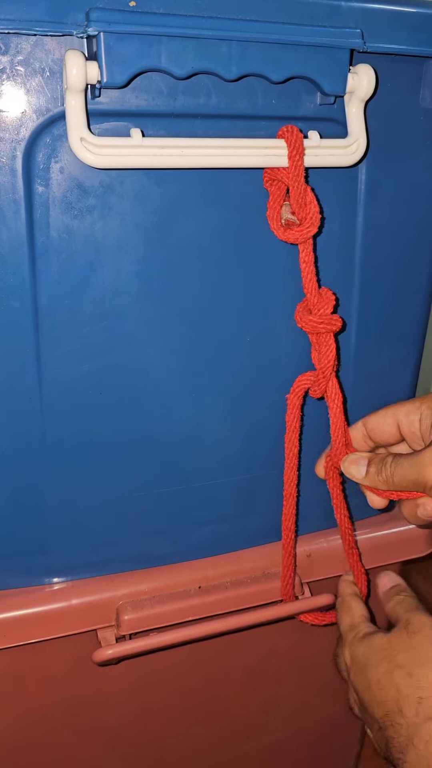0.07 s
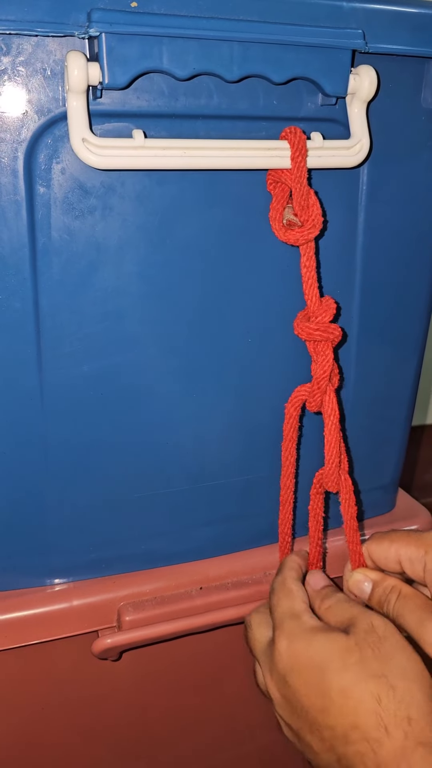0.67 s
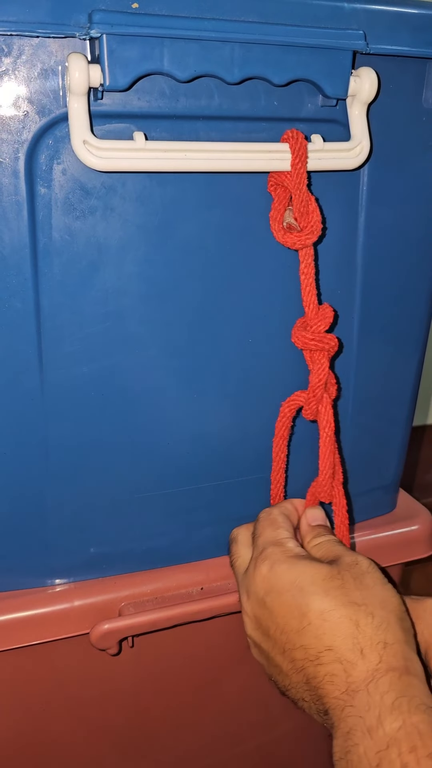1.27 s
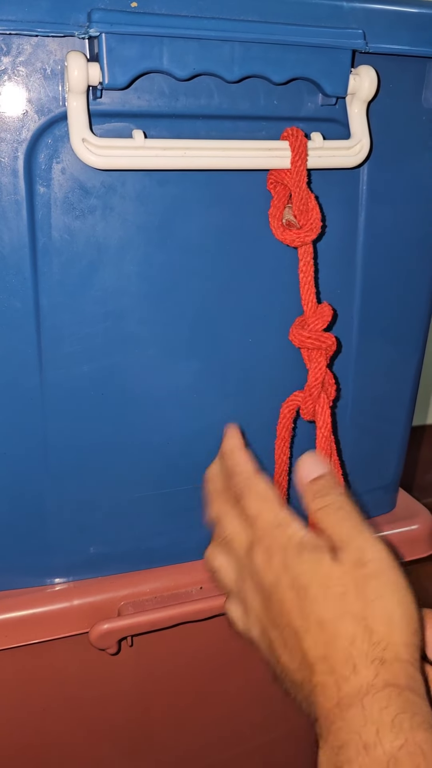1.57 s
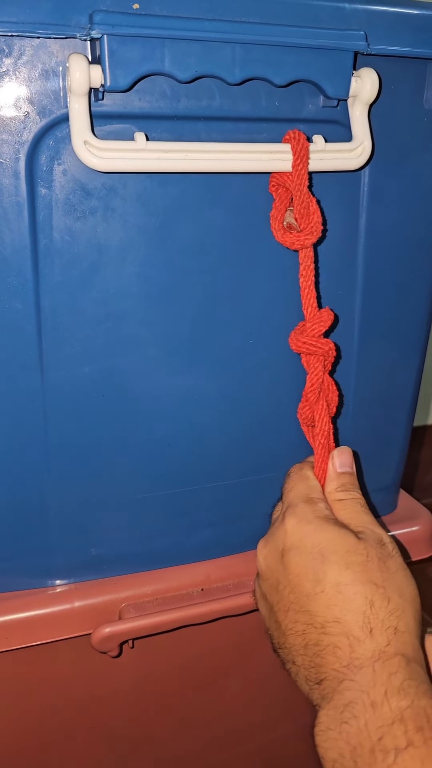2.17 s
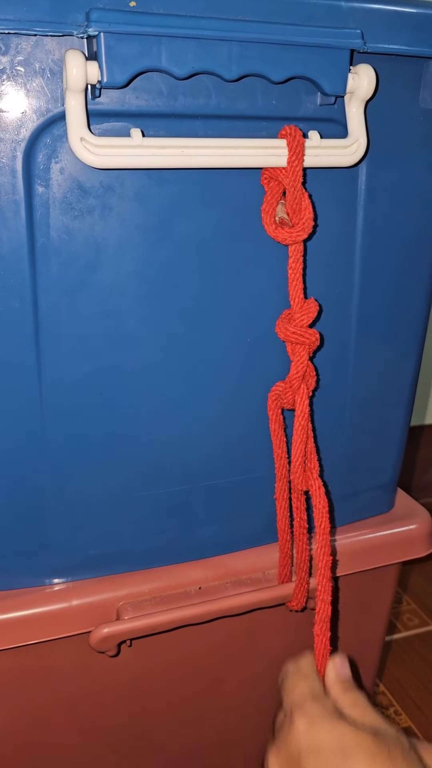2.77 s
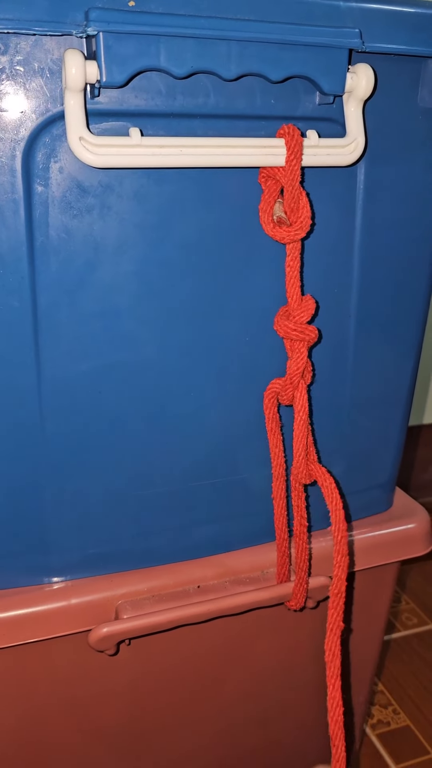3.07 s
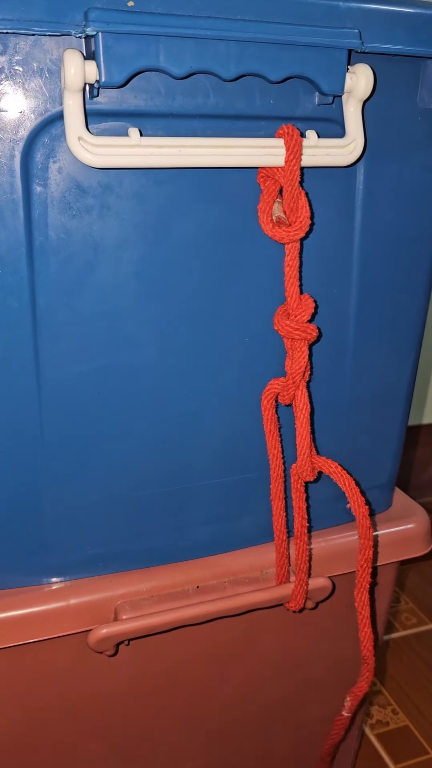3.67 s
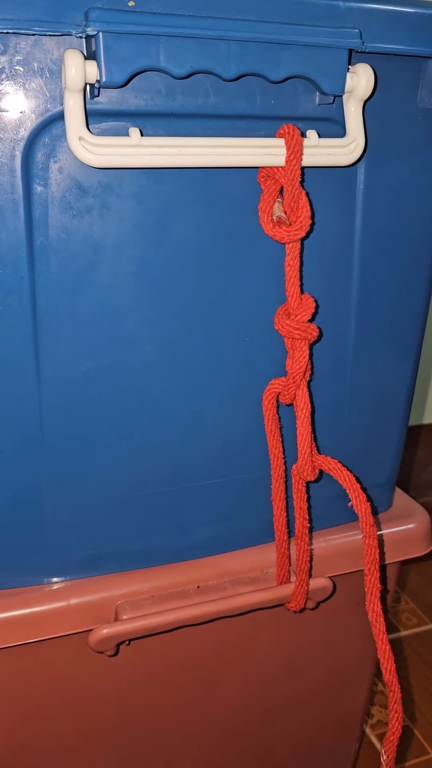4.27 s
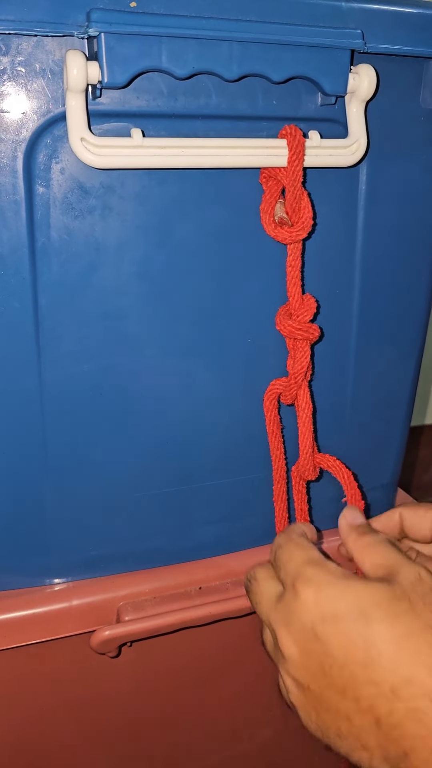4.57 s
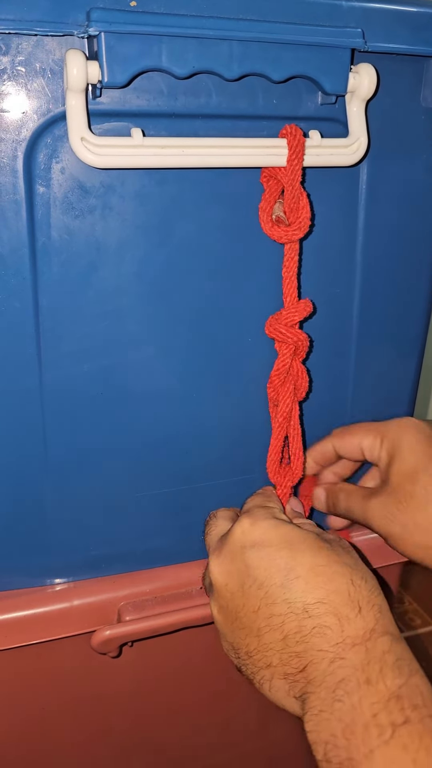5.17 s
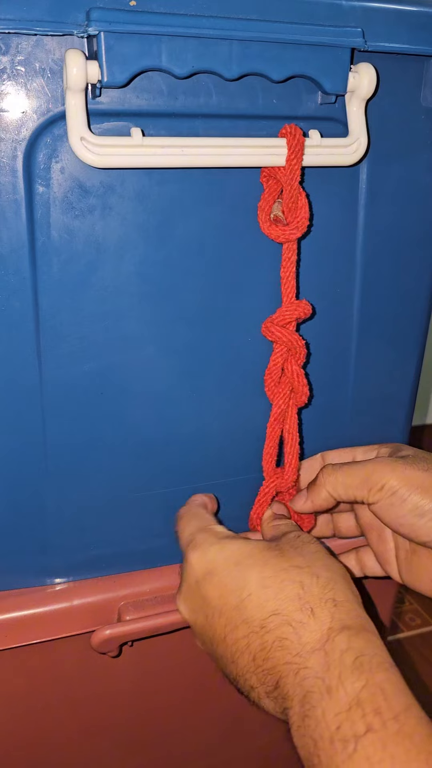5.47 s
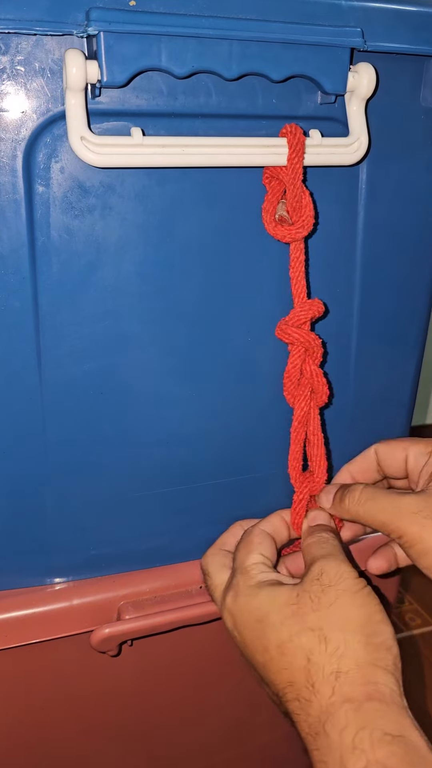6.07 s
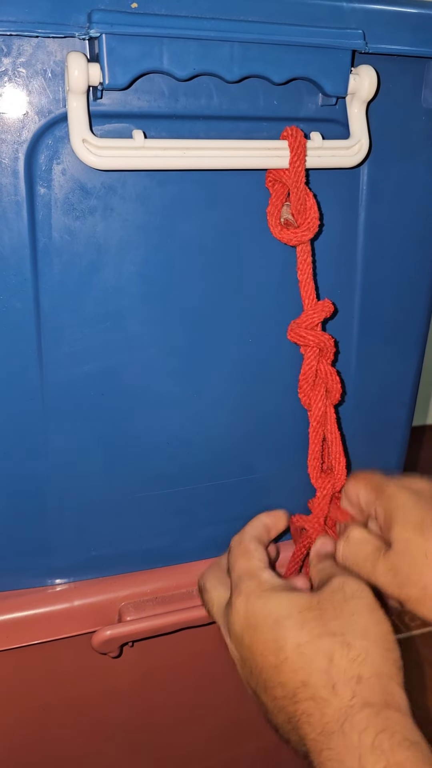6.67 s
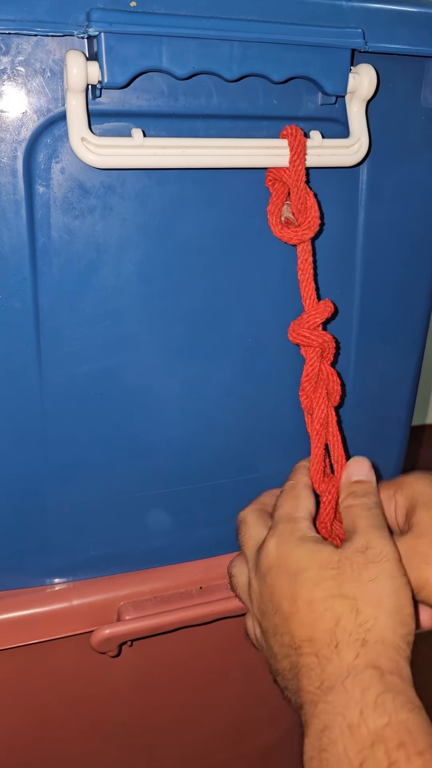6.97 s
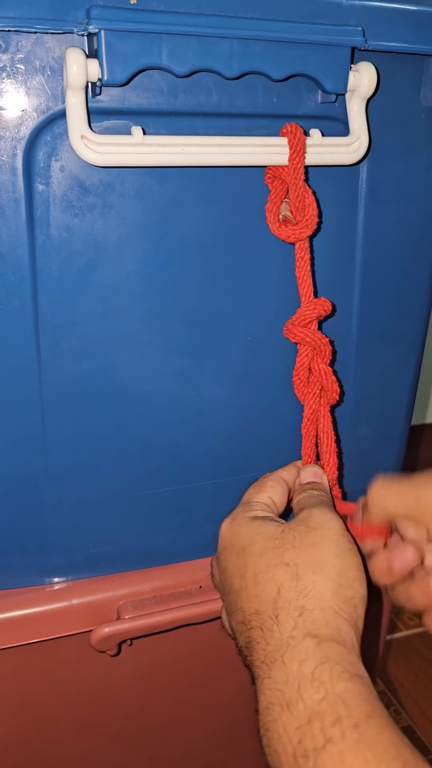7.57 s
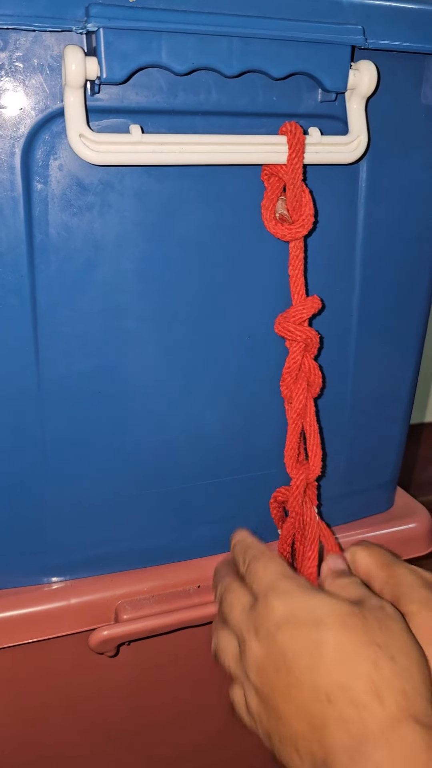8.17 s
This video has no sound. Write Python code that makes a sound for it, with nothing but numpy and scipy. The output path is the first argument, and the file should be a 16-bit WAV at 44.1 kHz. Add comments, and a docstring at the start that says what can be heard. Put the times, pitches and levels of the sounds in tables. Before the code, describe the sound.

Hands loop and tighten a rope against a hollow plastic storage bin, close to the microphone. Quick rasping pulls and a cluster of dull knocks come first, with one distant, echoing bang among them. After a smooth slide of loose rope, the room goes nearly quiet for a moment. Then come busier rustles, dry scrapes and tiny snaps of strands, with the bin wall booming softly and one sharp tug near the end.

```python
"""A quiet room: a twisted rope, hung from the handle of a big plastic storage bin, is looped, pulled
through and cinched by hand. Its fibres fizz and rasp as it slides, and single strands snap past each other.
Stick and slip shakes the hollow bin, rope and knuckles knock on it, and its walls boom as they flex.
Farther off something bangs once and a few faint swishes pass."""
import sys
import numpy as np
from scipy import signal
from scipy.fft import rfft, irfft
from scipy.io import wavfile
from scipy.ndimage import uniform_filter1d

SR = 44100
rng = np.random.default_rng(int(sys.argv[2]) if len(sys.argv) > 2 else 0)


def master(y):
    """Save y as 16-bit WAV."""
    cut = np.clip(np.atleast_2d(y).T, -1, 1)
    pcm = np.round(cut * 32767)  # scale
    wavfile.write(sys.argv[1], SR, pcm.astype(np.int16))


N = 371763
TIME = np.arange(N) / SR

# rope through the fingers: fastest t/s, swell/s, fade/s, fizz/dB, rasp/dB, drag/dB
GRIPPED_STROKES = [(0.17, 0.077, 0.12, -65, -62, -52), (0.385, 0.021, 0.049, -50.5, -45, -48),
                   (0.51, 0.045, 0.076, -68, -70, -44), (1.022, 0.017, 0.049, -60, -58, -52),
                   (1.24, 0.096, 0.053, -69, -75, -47), (1.52, 0.023, 0.031, -67.5, -65, -45.5),
                   (1.825, 0.056, 0.043, -74, -78, -53), (1.94, 0.063, 0.033, -72.5, -70, -56),
                   (2.118, 0.061, 0.055, -68, -71, -53), (2.29, .018, .04, -67.5, -64.5, -45.5),
                   (2.495, 0.02, 0.071, -67.5, -66, -49.5), (4.698, 0.029, 0.028, -72, -89, -69),
                   (4.85, 0.059, 0.13, -73, -76, -52), (4.984, 0.17, 0.03, -67, -69.5, -59.5),
                   (5.14, 0.067, 0.032, -68, -70.5, -53.5), (5.23, .04, 0.11, -70, -71, -51.5),
                   (5.35, 0.021, 0.038, -59.5, -51, -54), (5.45, 0.056, 0.02, -65, -64, -48.5),
                   (5.63, 0.099, 0.032, -73, -63, -54), (5.68, 0.029, .025, -69.5, -77, -44.5),
                   (5.805, 0.05, 0.065, -63.5, -57, -55.5), (5.87, 0.032, 0.063, -61, -54.5, -43.5),
                   (5.946, 0.028, .03, -60.5, -53, -44.5), (6.07, 0.026, 0.12, -63.5, -57, -48),
                   (6.234, 0.014, 0.015, -44.5, -50, -33.5), (6.28, 0.067, 0.12, -66.5, -77, -63),
                   (6.55, 0.073, 0.05, -59, -60.5, -46), (6.686, 0.057, .04, -63.5, -74, -56.5),
                   (6.79, 0.049, 0.029, -54, -51.5, -41.5), (6.942, 0.049, 0.051, -66.5, -62.5, -50.5),
                   (7.03, 0.045, 0.023, -63, -67, -54), (7.18, 0.084, .08, -65.5, -78, -55.5),
                   (7.29, 0.083, 0.045, -60.5, -58.5, -45.5), (7.395, 0.059, .06, -52.5, -48, -43.5),
                   (7.6, 0.069, 0.052, -70.5, -75, -65.5), (7.738, .04, 0.031, -47.5, -45, -32.5),
                   (7.838, 0.039, 0.053, -74, -55.5, -45.5), (8.042, 0.042, 0.12, -63.5, -60.5, -45.5),
                   (8.22, 0.18, .12, -71.5, -71, -60), (8.43, 0.021, .03, -60, -68, -70)]
# loose rope through the open hand: fastest t/s, swell/s, fade/s, sheen/dB, rasp/dB, drag/dB
LOOSE_RUNS = [(2.66, 0.14, 0.23, -58, -56.5, -44), (2.88, 0.32, 0.22, -64, -80, -64),
              (3.12, 0.29, 0.2, -66, -89, -65), (4.259, .055, 0.027, -63, -77, -77)]
# fibre fizz: f/Hz, level/dB
FIZZ_SPECTRUM = [(1500, -26), (3500, -4.5), (4800, -3), (6300, -4.5), (7600, -3), (9000, -3.5),
                 (10700, -3.5), (11500, 3.5), (12500, -4), (15800, -0.5)]
# rope rubbing the bin: f/Hz, level/dB
RUB_SPECTRUM = [(60, -12), (130, -8.5), (190, 0), (280, 1), (360, -7), (520, -10.5), (680, -17.5),
                (850, -20), (1400, -31), (3000, -52.5)]
# rope squeaking in the grip: f/Hz, width/Hz, level/dB
GRIP_RESONANCES = [(646, 127, 13), (810, 130, -3), (1080, 270, 2.5), (1410, 140, -1.5), (1605, 167, 7),
                   (1996, 150, -1), (2330, 1550, -8), (3020, 530, -5), (4250, 320, -4.5), (4850, 410, -3)]
# left-right likeness: f/Hz, correlation
COHERENCE = [(100, .99), (300, 0.9), (480, 0.64), (700, 0.36), (1200, 0), (16000, 0)]


def gain_of(db):
    """Decibels to amplitude."""
    return 10 ** (np.asarray(db) / 20)


def read(points, hz):
    """Table lookup on a log-frequency axis."""
    f, value = np.transpose(points)
    return np.interp(np.log(hz + 1), np.log(f + 1), value)


def add(mix, start_s, sound):
    """Mixes a sound in at start_s."""
    part = mix[:, max(round(start_s * SR), 0):][:, :sound.shape[-1]]
    part += sound[..., :part.shape[1]]


def colour(x, spectrum):
    """Shapes two unrelated channels and makes their bass alike; their mean has rms 1."""
    hz = np.fft.rfftfreq(x.shape[1], 1 / SR)
    a, b = rfft(x) * gain_of(read(spectrum, hz))
    same = read(COHERENCE, hz)
    mid, side = a * np.sqrt(1 + same), b * np.sqrt(1 - same)
    pair = irfft(np.array([mid + side, mid - side]), x.shape[1])
    return pair / np.sqrt(np.mean(pair.mean(0) ** 2) + 1e-20)


def hiss(spectrum, n=N):
    """Steady coloured noise."""
    return colour(rng.standard_normal((2, n)), spectrum)


def grains(spectrum, per_s, spread_db, n=N):
    """Tiny slips of many sizes, each in both channels."""
    size = gain_of(spread_db * np.minimum(rng.exponential(1, n), 3))
    slipping = rng.random(n) < per_s / SR
    return colour(size * slipping * rng.choice([-1, 1], (2, n)), spectrum)


def wander(hz, n=N):
    """Random curve with hz knots a second."""
    knots = rng.standard_normal(int(n / SR * hz) + 2)
    return 1.47 * np.interp(np.arange(n) / SR * hz, np.arange(len(knots)), knots)


def resonances(modes):
    """Spectrum (f/Hz, level/dB) of resonances with steep skirts."""
    hz, width_hz, db = np.transpose(modes)[:, :, None]
    grid_hz = np.geomspace(100, 16000, 900)
    power = (gain_of(db) / (1 + ((grid_hz - hz) / width_hz) ** 2)) ** 2
    return np.transpose([grid_hz, 10 * np.log10(power.sum(0))])


def dying(x, decay):
    """Each band decays with its own t60."""
    hz, t, bands = signal.stft(x, SR, nperseg=512)
    fade = gain_of(-60 * t / read(decay, hz)[:, None])
    return signal.istft(bands * fade, SR, nperseg=512)[1][:, :x.shape[1]]


def ring(modes, scatter_db):
    """Damped modes; the higher ones are out of step between channels."""
    hz, db, t60_s = np.transpose(modes)[:, :, None]
    t = np.arange(int(0.8 * SR)) / SR
    envelope = gain_of(db + scatter_db * rng.standard_normal(hz.shape) - 60 * t / t60_s)
    skew_rad = np.arccos(read(COHERENCE, hz)) / 2 * rng.choice([-1, 1], hz.shape)
    return np.array([(envelope * np.sin(2 * np.pi * hz * t + side * skew_rad)).sum(0) for side in (1, -1)])


def swing(t, hz, rise_cycles):
    """Vibration that peaks after rise_cycles, then dies."""
    age = hz * t / rise_cycles
    return age * np.exp(1 - age) * np.sin(2 * np.pi * hz * t)


def efforts(strokes, drop_db=12.5, roundness=1.24):
    """Gains of fizz, rasp and drag: each stroke swells to its fastest moment and fades."""
    t = TIME[::64]
    power = np.zeros((3, len(t)))
    for peak_s, swell_s, fade_s, *levels_db in strokes:
        away = np.maximum((peak_s - t) / swell_s, (t - peak_s) / fade_s)
        power += gain_of(np.array(levels_db)[:, None] - drop_db * away ** roundness) ** 2
    return np.array([np.interp(TIME, t, gain) for gain in np.sqrt(power)])


def through_bin(force, ring_db):
    """A force heard directly and through the bin's modes."""
    # f/Hz, level/dB, t60/s
    bin_modes = [(84, -6.5, 0.13), (173, 1.5, 0.1), (218, -3.5, 0.075), (256.7, 0.5, 0.081),
                 (318, -6, 0.095), (403.2, -0.5, 0.14), (500, 0.5, 0.12), (569, -4, 0.19),
                 (664, -0.5, 0.097), (736, -18, 0.067), (1100, -14, 0.12), (1405, -4, 0.12),
                 (1614, -27, .1), (1890, -17.5, 0.15)]
    rung = signal.fftconvolve(force, ring(bin_modes, scatter_db=3.5), axes=1)[:, :force.shape[1]]
    return force + gain_of(ring_db) * rung * np.linalg.norm(force) / np.linalg.norm(rung)


def dragging(tug_db=3, tug_lag_s=0.021):
    """Coarse stick and slip shakes the bin; its wall sways under tension and gives late to each tug."""
    # slow wall sway: t/s, level/dB
    sway_curve = [(0.0, -39.5), (0.21, -48), (1.13, -40), (1.5, -52.5), (2.28, -52.5), (2.7, -45.5),
                  (3.45, -62), (4.58, -52.5), (5.23, -58), (5.37, -49.5), (7.0, -51.5), (7.54, -56),
                  (7.89, -46.5), (8.43, -60.5)]
    # wall rumble: f/Hz, level/dB
    wall_spectrum = [(22, -47), (35, -5), (45, 12.5), (62, 13.5), (86, 5.5), (105, 4), (135, -3),
                     (250, -50)]
    _, _, drag = efforts(GRIPPED_STROKES + LOOSE_RUNS)
    slips = grains(RUB_SPECTRUM, per_s=600, spread_db=3) * drag
    pole = np.exp(-1 / (tug_lag_s * SR))
    tug = gain_of(tug_db) * signal.lfilter([1 - pole], [1, -pole], drag)
    sway = gain_of(np.interp(TIME, *np.transpose(sway_curve)))
    return gain_of(-2.5) * through_bin(slips, ring_db=-3.5) + hiss(wall_spectrum) * np.hypot(sway, tug)


def shifting(x, patchy_db):
    """Fingers move over the twist: patches of the spectrum come and go."""
    bands = signal.stft(x, SR, nperseg=512)[2]
    patches = rng.standard_normal(bands.shape[1:])
    for axis in (0, 1, 0, 1):
        patches = uniform_filter1d(patches, size=7, axis=axis)
    bands = bands * gain_of(patchy_db * patches / patches.std())
    out = signal.istft(bands, SR, nperseg=512)[1][:, :N]
    return out * np.linalg.norm(x) / np.linalg.norm(out)


def reflected(x):
    """The bin's face and the floor comb the sound, differently per channel."""
    # left delay/s, right delay/s, level/dB
    reflections = [(.0009, 0.0015, -19.5), (.0021, 0.0022, -12.5), (.0037, .0043, -12),
                   (.0062, 0.0047, -8.5)]
    out = x.copy()
    for left_s, right_s, db in reflections:
        add(out[:1], left_s, gain_of(db) * x[0])
        add(out[1:], right_s, gain_of(db) * x[1])
    return out


def sliding():
    """Fibres fizz as the rope runs and rasp under the fingers, in uneven clumps."""
    # loose rope: f/Hz, level/dB
    sheen_spectrum = [(2000, -22), (3800, -7.5), (5000, -6), (6500, -7.5), (8500, -3), (10700, -5),
                      (11500, 3), (12400, -1.5), (15800, -1.5)]
    stroke_fizz, stroke_rasp, _ = efforts(GRIPPED_STROKES)
    run_sheen, run_rasp, _ = efforts(LOOSE_RUNS)
    clumps_db = 1.64 * wander(110)
    gripped = grains(FIZZ_SPECTRUM, per_s=4500, spread_db=3.6) * stroke_fizz
    loose = grains(sheen_spectrum, per_s=14000, spread_db=3.5) * run_sheen
    catches = grains(resonances(GRIP_RESONANCES), per_s=1400, spread_db=3.4)
    rasp = gain_of(clumps_db - 4) * catches * np.hypot(stroke_rasp, run_rasp)
    fizz = gain_of(0.97 * clumps_db - 1.5) * gripped + gain_of(0.2) * loose
    return reflected(shifting(fizz, patchy_db=1.8) + shifting(rasp, patchy_db=3))


def knocks(soft_hz=221.6, octave_up_db=-20.5, tock_hz=560, contact_s=0.0015, clack_rise_s=0.0033):
    """The struck spot swings, faster if hit harder, with a hollow tock and a dry clack; the bin rings."""
    # t/s, thud/dB, tock/dB, clack/dB
    hits = [(0.145, -52, -46, -48), (0.36, -20, -37.5, -42), (0.505, -45.5, -45, -59),
            (1.002, -45, -24.5, -38), (1.013, -20, -24, -33), (1.022, -36, -20, -34.5),
            (1.083, -19.5, -28, -49.5), (1.215, -20, -30, -49), (1.246, -24.5, -28, -48),
            (1.511, -30.5, -66, -77), (1.535, -35.5, -65, -77), (1.807, -40.5, -70, -67),
            (2.284, -32.5, -64, -63), (2.622, -25, -53, -74), (2.642, -29.5, -51, -57),
            (2.711, -29.5, -54, -58), (4.795, -43, -71, -77), (4.832, -41.5, -68, -71),
            (5.037, -40, -65, -67), (5.2, -49, -42, -52.5), (5.293, -24, -33, -42),
            (5.453, -33.5, -68, -70), (5.668, -36, -50, -53), (5.866, -33, -63, -55),
            (5.948, -32, -57, -72), (6.229, -23.5, -45.5, -54), (6.25, -31, -57, -68),
            (6.539, -34.5, -69, -75), (6.786, -33, -43.5, -57), (6.803, -33, -46, -49),
            (7.022, -37.5, -57, -77), (7.729, -31, -36, -36.5), (7.835, -32.5, -50, -41),
            (8.025, -45, -55, -52), (8.043, -33.5, -45.5, -48.5), (8.149, -37, -58, -46)]
    out = np.zeros((2, N))
    t = np.arange(SR // 2) / SR
    for start_s, thud_db, tock_db, clack_db in hits:
        spot_hz = soft_hz * (1 + gain_of(tock_db - octave_up_db))
        thud = gain_of(thud_db - 2.5) * swing(t, spot_hz, rise_cycles=0.58)
        tock = gain_of(tock_db + 1.5) * swing(t, tock_hz * rng.uniform(0.856, 1.02), rise_cycles=1.13)
        clack = gain_of(clack_db - 2) * dry_clack(t / clack_rise_s)
        add(out, start_s + contact_s, through_bin(thud + tock + clack, ring_db=-6))
    return out


def dry_clack(age):
    """Noise burst of a knock, peaking at age 1."""
    # f/Hz, level/dB
    clack_spectrum = [(350, -11.5), (650, 8), (950, 1), (1400, -4.5), (1750, -14), (2300, -18.5),
                      (4000, -31), (9000, -35)]
    return age * np.exp(1 - age) * hiss(clack_spectrum, len(age))


def pulls(rise_s=0.00082, release_s=0.009):
    """In a quick pull each ridge of the twist bumps the bin and sheds a puff of fizz."""
    # t/s, length/s, ridge rate/Hz, fizz/dB, judder/dB
    quick_pulls = [(0.361, 0.076, 89, -58.5, -28), (0.997, 0.054, 93, -73, -32),
                   (6.225, 0.025, 92, -54, -39), (6.765, 0.036, 71, -60.5, -39),
                   (7.369, 0.073, 99, -59, -41), (7.729, 0.014, 71, -49.5, -32.5)]
    out = np.zeros((2, N))
    t = np.arange(SR // 2) / SR
    for start_s, length_s, ridge_hz, fizz_db, judder_db in quick_pulls:
        stroke = np.minimum(t / rise_s, 1) * np.exp(-np.maximum(t - length_s, 0) / release_s)
        phase = 2 * np.pi * np.cumsum(ridge_hz * (1 + 0.12 * wander(73, len(t)))) / SR
        puffs = stroke * (1 + 0.13 * np.cos(phase))
        force = 1.03 * stroke * np.sin(phase) + 0.52 * puffs * hiss(RUB_SPECTRUM, len(t))
        fibres = grains(FIZZ_SPECTRUM, per_s=6600, spread_db=9, n=len(t))
        fibres += 0.81 * hiss(resonances(GRIP_RESONANCES), len(t))
        judder = gain_of(judder_db) * through_bin(force, ring_db=-22)
        add(out, start_s, judder + gain_of(fizz_db) * puffs * fibres)
    return out


def snaps(decay_s=0.0051):
    """A strand lets go with a bright tick."""
    # t/s, level/dB
    ticks = [(0.5, -53), (0.5284, -54), (1.1199, -56), (1.1777, -57), (1.499, -57.5), (2.286, -54),
             (4.4526, -60), (5.448, -63), (5.8604, -43.5), (5.9433, -48), (6.0664, -47.5), (6.4746, -48.5),
             (7.1132, -59), (7.175, -45.5)]
    out = np.zeros((2, N))
    t = np.arange(2048) / SR
    for start_s, db in ticks:
        fibres = hiss(FIZZ_SPECTRUM, len(t)) + 0.24 * hiss(resonances(GRIP_RESONANCES), len(t))
        add(out, start_s, gain_of(db - 7) * np.exp(-t / decay_s) * fibres)
    return out


def far_bang(start_s=0.585, rise_s=0.02, early_s=0.11, noise_db=-30, ring_db=-37):
    """A distant bang arrives as dense early echoes and reverberation, with a few lingering tones."""
    # f/Hz, level/dB
    bang_spectrum = [(60, -9), (130, -4), (240, -0.5), (400, -7), (510, 1), (630, -15), (780, -12),
                     (1330, -19.5), (2200, -30.5), (5400, -40.5), (6300, -52), (7500, -44), (9000, -58),
                     (15000, -58)]
    # f/Hz, t60/s
    bang_decay = [(150, 0.98), (500, 0.88), (1200, 0.71), (2500, 0.71), (5000, 1), (10000, 1)]
    # f/Hz, level/dB, t60/s
    bang_modes = [(176.5, 6, 1), (430, -15, 0.48), (496, 0, 0.99), (815, -11, 0.75), (1104, -11.5, 0.69),
                  (1176, -12, 0.38)]
    out = np.zeros((2, N))
    t = np.arange(SR) / SR
    onset = np.minimum(t / rise_s, 1) * (1 + 0.4 * np.exp(-t / early_s))
    add(out, start_s, gain_of(noise_db) * onset * dying(hiss(bang_spectrum, SR), bang_decay))
    tones = ring(bang_modes, scatter_db=0)
    add(out, start_s + rise_s, gain_of(ring_db) * tones * onset[:tones.shape[1]])
    return out


def booms():
    """A broad wall flexes for a few slow cycles as the rope is tugged or let go."""
    # t/s, level/dB, f/Hz
    flexes = [(1.011, -21.5, 82.7), (1.037, -20, 68.4), (1.231, -24.5, 79.6), (1.253, -25.5, 72),
              (1.718, -33, 73.9), (2.614, -26.5, 90), (5.294, -22.5, 164), (5.455, -28.5, 75.4),
              (6.074, -28.5, 75), (6.233, -22, 163), (6.234, -24.5, 79), (6.302, -33.5, 72),
              (6.605, -33, 81.4), (6.773, -32, 164), (6.788, -20.5, 86.5), (7.736, -21, 84),
              (8.042, -31, 87.5)]
    out = np.zeros((2, N))
    t = np.arange(SR // 3) / SR
    for start_s, db, hz in flexes:
        add(out, start_s, gain_of(db - 2.5) * swing(t, hz, rise_cycles=0.76))
    return out


def far_swishes(swell_share=0.24, fade_s=0.091):
    """Faint bands of noise swell and fade."""
    # t/s, length/s, f/Hz, width/Hz, level/dB
    swishes = [(3.212, 0.29, 3900, 902, -79), (3.297, 0.14, 1120, 446, -75), (3.349, 0.43, 6560, 3000, -84),
               (3.604, 0.038, 1320, 110, -74.5), (3.617, 0.13, 2970, 450, -79),
               (3.758, 0.1, 1310, 172, -68.5), (3.769, 0.1, 2250, 400, -70.5),
               (3.779, 0.1, 3960, 1500, -74), (3.821, 0.082, 766, 90, -65.5), (4.02, 0.089, 997, 118, -62)]
    out = np.zeros((2, N))
    t = np.arange(SR) / SR
    for start_s, length_s, hz, width_hz, db in swishes:
        swell = np.minimum(t / (swell_share * length_s), 1)
        fade = np.exp(-np.maximum(t - length_s, 0) / fade_s)
        add(out, start_s, gain_of(db) * swell * fade * hiss(resonances([(hz, width_hz, 0)]), SR))
    return out


def room(x, build_s=0.015):
    """Diffuse tail from the hard floor and walls."""
    # f/Hz, t60/s
    room_decay = [(100, 0.64), (500, 0.49), (2000, 0.39), (6000, 0.42), (14000, 0.14)]
    tail = dying(hiss([(100, 0.038), (16000, 0)], SR), room_decay) * np.minimum(TIME[:SR] / build_s, 1)
    return signal.fftconvolve(x, tail / np.linalg.norm(tail[0]), axes=1)[:, :N]


def scene(reverb_db=-15.5, quiet_db=-58.5):
    """Rope and bin close by, the room behind them."""
    # room tone: f/Hz, level/dB
    quiet_spectrum = [(25, -17), (48, 0), (70, -4.5), (130, -16.5), (268, -17), (351, -26), (500, -24.5),
                      (730, -33.5), (2260, -43.5), (4700, -44.5), (7000, -54), (10000, -60), (11500, -47.5),
                      (15800, -51)]
    near = sliding() + dragging() + pulls() + knocks() + booms() + snaps()
    reverb = gain_of(reverb_db) * room(near)
    return near + reverb + far_bang() + far_swishes() + gain_of(quiet_db) * hiss(quiet_spectrum)


def record(dry, edge_hz=15850):
    """Colour of the two microphone ports, then the band limit."""
    # microphone at its place in the room: f/Hz, gain/dB
    response = [(18, -17), (30, -5), (40, -1), (60, 0), (100, 2), (124, -4.5), (160, 0), (16000, -1)]
    # f/Hz, left minus right/dB
    port_balance = [(300, 0.73), (550, 0), (1100, -0.5), (2600, 2.5), (4900, 2.5), (6500, -1), (9500, -6),
                    (12500, -3), (15500, 2)]
    hz = np.fft.rfftfreq(N, 1 / SR)
    lean_db = read(port_balance, hz) / 2
    ports_db = read(response, hz) + np.array([lean_db, -lean_db])
    heard = irfft(rfft(dry) * gain_of(ports_db), N)
    low_pass = signal.firwin(1023, edge_hz, window=("kaiser", 9), fs=SR)
    return signal.oaconvolve(heard, low_pass[None], "same")


dry = scene()
out = record(dry)
master(out)
```